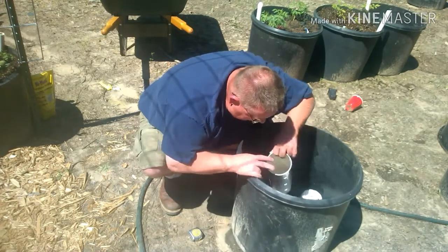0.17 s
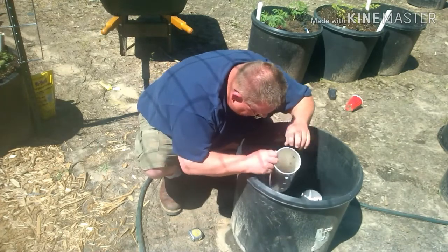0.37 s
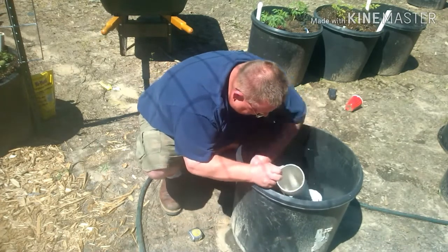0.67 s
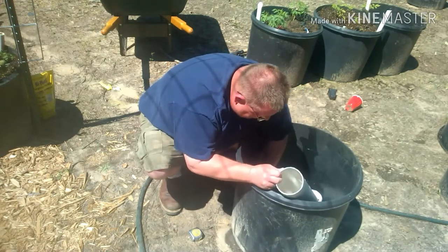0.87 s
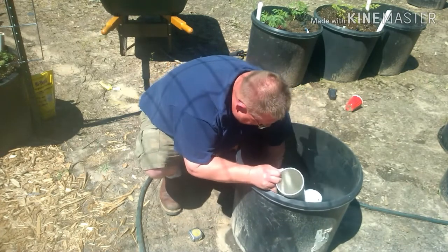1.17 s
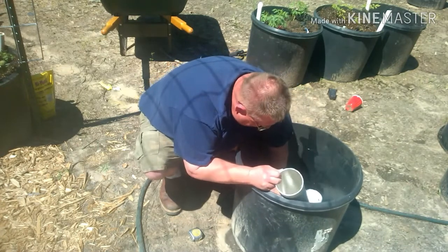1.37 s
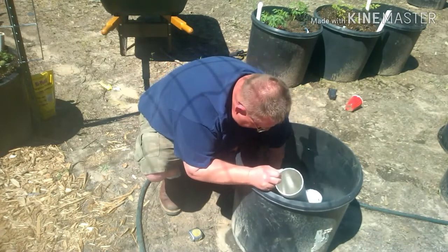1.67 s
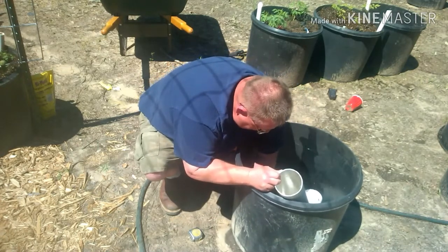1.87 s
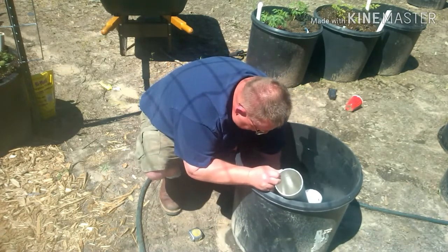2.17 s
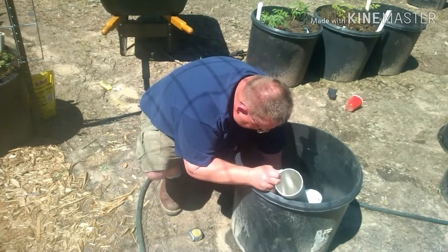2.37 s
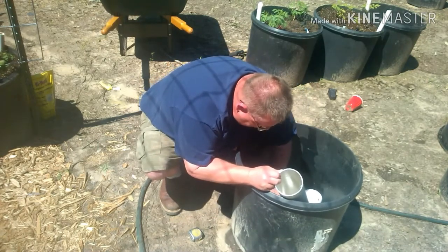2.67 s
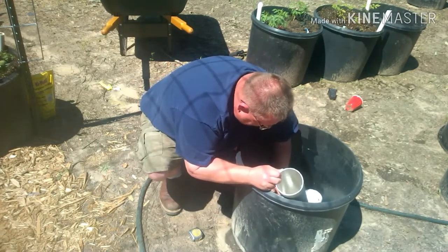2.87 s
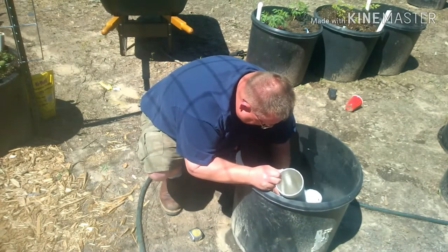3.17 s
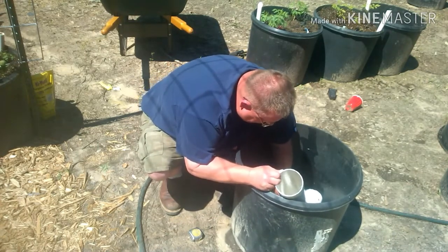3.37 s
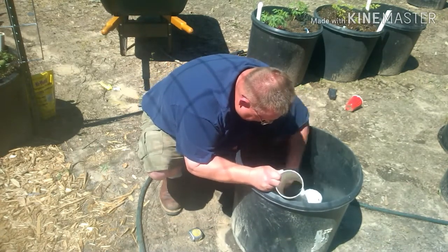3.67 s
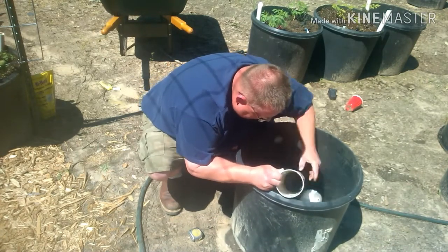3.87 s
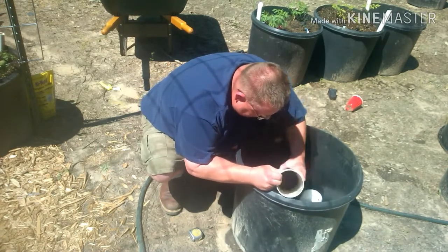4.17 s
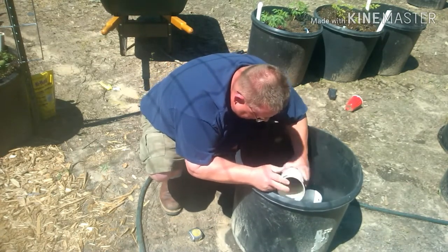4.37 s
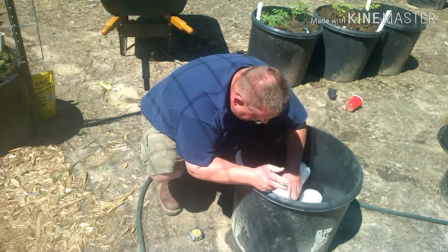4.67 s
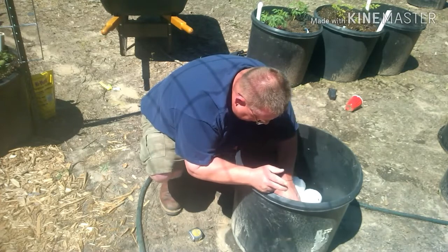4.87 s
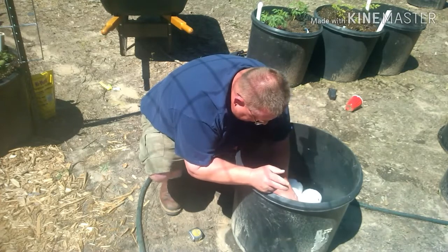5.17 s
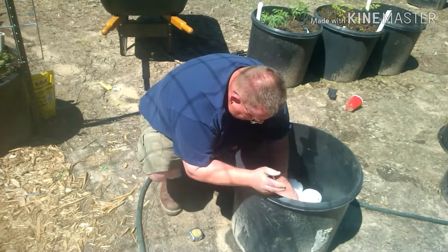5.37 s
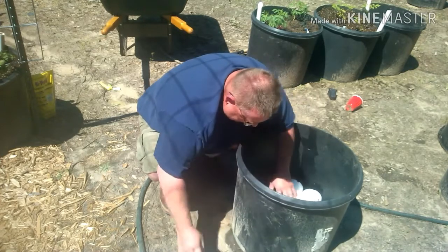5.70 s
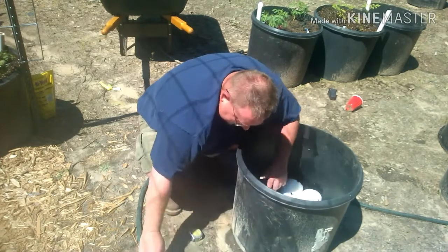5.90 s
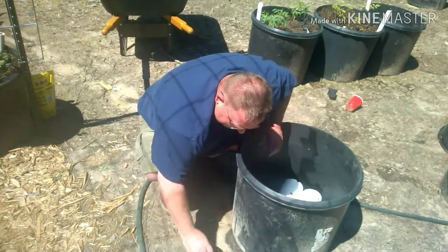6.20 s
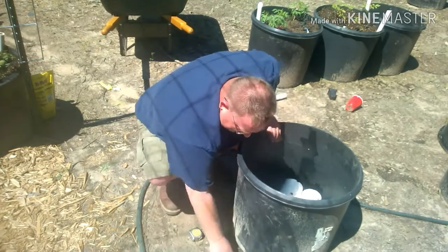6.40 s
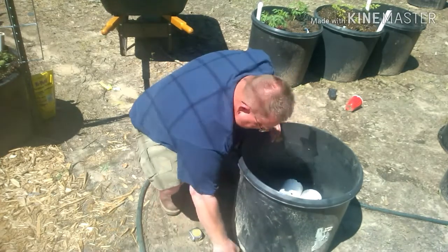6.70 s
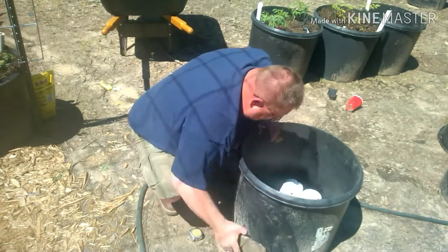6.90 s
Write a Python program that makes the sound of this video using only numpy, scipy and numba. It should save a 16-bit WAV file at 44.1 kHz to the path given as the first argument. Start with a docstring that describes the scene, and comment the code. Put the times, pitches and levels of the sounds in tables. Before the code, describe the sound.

Hollow plastic rattles, gritty drags and a final sharp knock in a large tub in a yard, then quiet air and birdsong.

```python
"""A knock and a faint gritty scrape, then bursts of plastic pipes dragged and knocked in a big plastic tub in a yard.
Slips and blows ring modes of the tub wall and the pipe; noise shaped by the same contacts is the crackling grit.
Birds, gliding near-sine notes, sing in the trees, with a few steady tones, over far traffic and wind of filtered noise.
A camera with two close microphone ports widens its stereo by subtracting each port, delayed, from the other."""
import sys
import numpy as np
from scipy import signal
from scipy.fft import rfft, irfft, next_fast_len
from scipy.io import wavfile
from scipy.ndimage import uniform_filter1d
from numba import njit

SR = 44100
rng = np.random.default_rng(int(sys.argv[2]) if len(sys.argv) > 2 else 0)


def pcm_store(signal):
    """Save signal as 16-bit PCM."""
    levels = np.round(np.clip(np.atleast_2d(signal), -1, 1) * 32767)
    wavfile.write(sys.argv[1], SR, levels.astype(np.int16).T)


N = 310464

# blows on the pipe: (time [s], crack level [dB], pipe body level [dB], pipe overtone level [dB],
# brightest overtone [Hz])
BLOWS = [(0.002, -66.0, -37.0, -46.5, 1070.0), (0.123, -49.0, -64.0, -63.5, 1500.0),
         (0.67, -50.5, -45.0, -45.5, 980.0), (0.8365, -67.0, -20.0, -29.5, 610.0),
         (0.856, -55.0, -26.0, -46.5, 780.0), (0.8975, -50.0, -43.0, -27.5, 760.0),
         (1.2232, -48.0, -28.0, -14.5, 920.0), (1.238, -40.0, -26.0, -9.5, 1400.0),
         (1.26, -55.0, -19.0, -28.5, 1080.0), (1.3144, -36.5, -30.0, -14.5, 1340.0),
         (1.3328, -54.0, -26.0, -17.5, 1160.0), (1.348, -56.0, -30.0, -18.5, 1140.0),
         (1.382, -42.0, -28.0, -15.5, 990.0), (1.4063, -39.5, -32.0, -15.5, 1280.0),
         (1.424, -56.0, -27.0, -19.5, 780.0), (1.45, -56.0, -21.0, -23.5, 1030.0),
         (1.4865, -34.5, -26.0, -11.5, 1080.0), (1.5168, -66.0, -19.0, -38.5, 910.0),
         (1.9533, -47.5, -64.5, -31.5, 1080.0), (1.971, -47.0, -44.0, -33.5, 780.0),
         (2.0036, -46.0, -42.0, -28.5, 980.0), (2.022, -45.0, -33.0, -32.5, 980.0),
         (2.074, -56.0, -18.0, -27.5, 920.0), (2.1135, -39.0, -16.0, -34.5, 760.0),
         (2.142, -50.0, -26.0, -28.5, 870.0), (2.1915, -43.0, -26.0, -20.5, 820.0),
         (2.2248, -40.0, -14.5, -22.5, 890.0), (2.2395, -34.0, -19.0, -11.5, 910.0),
         (2.2543, -49.0, -19.0, -20.5, 860.0), (2.2825, -34.0, -16.0, -11.5, 860.0),
         (2.335, -55.0, -17.0, -28.5, 810.0), (2.362, -50.0, -28.0, -24.5, 1120.0),
         (2.373, -56.0, -20.0, -24.5, 780.0), (2.386, -37.5, -18.0, -17.5, 700.0),
         (2.434, -52.0, -34.0, -30.5, 730.0), (2.469, -44.5, -47.0, -36.5, 1180.0),
         (2.788, -58.0, -36.5, -64.5, 790.0), (3.022, -48.0, -38.0, -30.5, 1260.0),
         (3.031, -34.0, -32.5, -16.0, 1100.0), (3.1437, -45.0, -44.0, -25.5, 1160.0),
         (3.165, -39.5, -46.0, -24.5, 1340.0), (3.18, -41.5, -39.0, -25.5, 1440.0),
         (3.197, -55.0, -26.0, -32.5, 990.0), (3.26, -48.0, -33.0, -22.5, 1100.0),
         (3.275, -45.0, -33.0, -17.5, 1180.0), (3.29, -52.0, -22.0, -30.5, 1070.0),
         (3.311, -50.0, -23.0, -28.5, 980.0), (3.3208, -37.5, -22.0, -20.5, 1070.0),
         (3.348, -55.0, -29.0, -31.5, 1070.0), (3.375, -60.0, -33.0, -38.5, 1050.0),
         (3.543, -53.0, -31.0, -29.5, 820.0), (3.5554, -55.0, -27.0, -33.5, 990.0),
         (3.772, -64.0, -34, -50.5, 760.0), (3.976, -48.0, -40, -47.5, 910.0),
         (4.1521, -60.0, -37.0, -48.5, 1160.0), (4.9468, -39.5, -25.0, -22.5, 1220.0),
         (4.956, -26.0, -18.0, -11.5, 940.0), (4.961, -40.0, -26.0, -13.5, 860.0),
         (5.0652, -24.5, -8.0, -9.5, 1460.0), (5.083, -37.5, -19.0, -16.5, 1220.0),
         (5.5238, -64.0, -44.0, -41.5, 1260.0), (5.758, -54.0, -43.0, -47.5, 1300.0)]


def pipes():
    """Dragged and struck pipes: the same slips ring the plastic and shed grit."""
    slips = stick_slip(rate=520., scatter_db=1.03)
    *body_drags, grit_drag = drag_gains()
    return tub_and_pipe(slips, body_drags) + grit_and_cracks(slips, grit_drag)


def tub_and_pipe(slips, drags):
    """Tub and pipe modes ring alike at both ports, a little later and softer at the far one."""
    # modes of the pipe body, the tub wall and the pipe overtones:
    # (frequency [Hz], level [dB], decay by 60 dB [s])
    pipe_body = [(318.4, -0.5, 0.035), (368, 2.5, 0.075), (424.7, 3, 0.085), (473, -2.5, 0.053),
                 (565, -3, 0.035)]
    tub_wall = [(120, 4, .14), (137, 10, .2), (152, 5, .14), (188, 3, .08), (240, 4, .06)]
    pipe_overtones = [(647, -2, 0.05), (776, -4, 0.05), (865.5, -5.5, 0.062), (939, -3, 0.056),
                      (1027, -7.5, 0.048), (1177, -8.5, 0.04), (1312, -5.5, 0.042), (1414, -4.5, 0.03),
                      (1682, -8, 0.028), (1815, -19, 0.04)]
    # thuds on the tub wall: (time [s], level [dB])
    thuds = [(0.8341, -32), (1.4045, -28.5), (1.42, -31), (2.2408, -25), (2.248, -14.5), (2.281, -15.5),
             (2.291, -18), (3.026, -32.5), (3.19, -33), (3.235, -28), (3.3216, -29), (3.334, -21),
             (3.5419, -42), (3.7702, -38), (4.1513, -37), (4.9466, -28), (5.066, -17)]
    far_port_lag, far_port_db = 4.83, -0.95  # lag in samples

    hit_s, _, body_db, overtone_db, bright_hz = np.transpose(BLOWS)
    thud_s, thud_db = np.transpose(thuds)
    near = ring(pipe_body, slips, drags[0], hit_s, body_db, 420, spot_db=2.6, spread_s=.0025)
    near = near + ring(tub_wall, slips, drags[1], thud_s, thud_db, 150, spot_db=2.6, spread_s=.0015)
    near = near + ring(pipe_overtones, slips, drags[2], hit_s, overtone_db, bright_hz, spot_db=2.6, spread_s=.0015)
    # the ringing is cut steeply below about 112 Hz
    near = signal.sosfilt(signal.butter(6, 112, "high", fs=SR, output="sos"), near)

    # a phase slope delays by a fraction of a sample
    size = next_fast_len(N)
    turns = np.arange(size // 2 + 1) / size * far_port_lag
    far = irfft(rfft(near, size) * np.exp(-2j * np.pi * turns), size)[:N]
    return np.array([near, undb(far_port_db) * far])


def grit_and_cracks(slips, drag):
    """Grit and cracks scatter off the wall and reach the two ports unlike: separate noise at each."""
    # colour of grit and cracks: (frequency [Hz], relative level [dB])
    sand_spectrum = [(1200, 4), (2050, 6.5), (3400, -0.5), (5000, -1), (7000, -1), (10000, -3), (14500, -5),
                     (15500, -25)]
    # each slip sheds a short spray of grains over an even sandy hiss
    spray = signal.lfilter([1], [1, -.97], spikes(*slips) ** 2)
    grit = drag * np.sqrt(0.52 + 0.29 * spray / spray.mean())

    # a crack has a sharp burst and a fainter, slower tail
    t = np.arange(int(.08 * SR)) / SR
    burst = 1.15 * np.exp(-t / 0.0066) * (1 - np.exp(-t / 0.0007))
    tail = burst + 0.17 * np.exp(-t / 0.027)
    hits = spikes((np.transpose(BLOWS)[0] * SR).astype(int), undb(np.transpose(BLOWS)[1]))
    crack = signal.fftconvolve(hits, tail)[:N]

    sand = colour(rng.standard_normal((2, N)), sand_spectrum)
    return 1.41 * sand * np.hypot(grit, crack)


def drag_gains():
    """Rise, hold and fall of each drag for pipe body, tub wall, overtones and grit; overtones fall furthest."""
    # drags: (start [s], rise [s], hold [s], fall [s], pipe body level [dB], swell over the hold [dB],
    # then tub wall, pipe overtones and grit against the body [dB])
    drags = [(0.05, 0.028, 0.12, .05, -70, -3.5, -2, -8, 15),
             (0.2, 0.083, 0.018, 0.045, -46.5, -4, -13, -6, -20),
             (0.833, 0.0049, 0.017, 0.046, -36.5, 3, -12, -12, -35),
             (0.839, 0.029, .02, 0.053, -41.5, 1.5, -6, 6, -11),
             (1.189, 0.039, 0.24, 0.069, -28.5, -4, -14, 2, -11.5),
             (1.49, 0.012, 0.024, 0.17, -39, -3, -3, -1, -34),
             (1.92, 0.14, 0.34, 0.18, -31.5, 3, -19.5, -3, -17),
             (2.19, 0.062, 0.034, 0.056, -24, -0.5, -0.5, -4, -26.5),
             (3.129, 0.048, .155, .13, -35, 3, -3.5, 1.5, -19),
             (4.11, 0.042, 0.025, 0.15, -49.5, 0.5, -4, -10, -4),
             (4.38, 0.025, 0.032, 0.027, -47, -2.5, -20, -1, -14),
             (4.944, 0.0038, 0.011, 0.075, -24, -1, -9, -2, -17),
             (4.989, 0.041, 0.029, 0.012, -56.5, -2, 0, 18, 19.5),
             (5.058, 0.004, 0.019, 0.088, -19.5, 2.5, -1.5, -6.5, -17),
             (5.12, 0.032, 0.11, .15, -67.5, -4.5, 20.5, -7, 0),
             (5.5, 0.026, .01, 0.058, -44, -3, -23, -12, -13)]
    # how far under its hold a drag rises from and falls to: (body [dB], tub [dB], overtones [dB], grit [dB])
    fade_db = (32, 28.7, 40.7, 37)
    tables = []
    for start, rise, hold, fall, db, swell_db, *shares_db in drags:
        times = np.cumsum([start, rise, hold, fall])
        shape = db + np.array([[0], [0], [swell_db], [swell_db]]) - np.outer([1, 0, 0, 1], fade_db)
        tables.append(np.column_stack([times, shape + [0, *shares_db]]))
    return [curves(tables, k + 1) for k in range(4)]


def stick_slip(rate, scatter_db):
    """Random slip moments, about rate a second, of nearly even size; train rms 1."""
    chance = rng.random((int(N / SR * 1500), 2))
    at = np.cumsum(-np.log(chance[:, 0]) * SR / rate).astype(int)
    size = undb(-scatter_db * np.log(0.089 + chance[:, 1]))[at < N]
    return at[at < N], size * np.sqrt(N / np.sum(size ** 2))


def ring(modes, slips, slip_gain, hit_s, blow_db, bright_hz, spot_db, spread_s):
    """Slips and blows ring each mode; every contact lands on another spot, so mode shares and onsets differ."""
    drift_share = .02  # grip and tilt change, so each mode's pitch drifts
    wander_db = 3.2  # as the contact slides along, each mode swells and fades on its own
    focus_db = 10  # a blow's modes an octave from its brightest are this much weaker
    push_cycles = .2  # plastic yields: a blow builds each mode up over this many cycles

    at, size = slips
    hits = (hit_s * SR).astype(int)
    slip_spot = rng.standard_normal((len(at), len(modes)))
    hit_spot = undb(spot_db * rng.standard_normal((len(hits), len(modes))))
    onset = (spread_s * SR * rng.random((len(hits), len(modes)))).astype(int)
    out = 0
    for k, (hz, db, t60) in enumerate(modes):
        fade = np.exp(-np.log(1000) / (t60 * SR))
        step = 2 * np.pi * hz * (1 + drift_share * walk(9)) / SR
        # a dense train of rms 1 rings the mode at rms 1
        even = np.sqrt(2 * (1 - fade ** 2))
        rub = spikes(at, size * slip_spot[:, k]) * slip_gain * undb(wander_db * walk(14)) * even
        focused_db = blow_db - focus_db * np.log2(hz / bright_hz) ** 2
        blow = spikes(hits + onset[:, k], undb(focused_db) * hit_spot[:, k])
        soft = np.exp(-hz / (push_cycles * SR))
        out = out + undb(db) / np.sqrt(len(modes)) * resonate(rub, blow, step, fade, soft)
    return out


@njit
def resonate(rub, blow, step, fade, soft):
    """One mode whose phase advances by step radians a sample; blows build it up, slips kick it at once."""
    out, mode, push = np.empty(len(rub)), 0j, 0j
    for i in range(len(rub)):
        turn = np.exp(1j * step[i])
        push = soft * turn * push + (1 - soft) * blow[i] + 1e-18
        mode = fade * turn * mode + rub[i] + push
        out[i] = mode.imag
    return out


def birds_and_tones():
    """Bird notes and steady tones reach one port late; bird notes and twitter also ring on among the trees."""
    lag = 11  # samples between the ports for notes and steady tones
    trees_db = 1.2
    flutter, rasp = walk(150), walk(400)
    song = bird_notes(flutter, rasp)
    direct = song + steady_tones(flutter)
    echo = among_trees(song + twitter(count=160, level_db=-66))
    return undb([[1.2], [-.8]]) * np.array([direct, np.roll(direct, lag)]) + undb(trees_db) * echo


def bird_notes(flutter, rasp):
    """Near-sine notes with a slight flutter glide to a turn and on to their end."""
    # notes: (start [s], first glide [s], second glide [s], start [Hz], turn [Hz], end [Hz], level [dB])
    notes = [(.445, 0.016, 0.017, 4300, 4250, 3350, -66), (.51, .03, .012, 4300, 4350, 4100, -65),
             (.578, .008, .008, 3100, 3600, 4200, -62), (.697, 0.013, 0.02, 4150, 3450, 3500, -56),
             (.754, 0.01, 0.0082, 3260, 4220, 3430, -50.5), (.922, 0.021, 0.013, 3040, 4220, 3330, -47.5),
             (2.34, 0.011, 0.008, 3480, 3150, 2750, -47), (2.44, .21, 0.065, 2300, 3380, 3520, -51),
             (2.872, .008, .02, 2380, 2420, 2420, -53), (2.895, 0.017, 0.026, 4250, 3280, 2900, -61),
             (3.066, 0.021, 0.022, 3050, 4350, 4380, -49), (4.293, .011, 0.015, 4000, 4180, 3420, -56),
             (4.297, .008, .02, 4720, 4700, 3800, -58), (4.339, 0.017, 0.016, 3150, 4720, 3200, -49.5),
             (4.438, 0.008, 0.016, 3700, 4200, 3050, -48), (4.675, .012, .014, 3800, 3650, 3350, -61),
             (4.55, 0.008, 0.008, 2900, 3000, 3150, -60), (.493, 0.007, 0.007, 3150, 3400, 3600, -60),
             (.525, .008, .008, 3400, 3500, 3700, -61), (6.345, 0.0081, .015, 3880, 4000, 3890, -58),
             (6.366, 0.007, 0.007, 3100, 3700, 4400, -56), (6.39, 0.02, 0.016, 5000, 3500, 3200, -52),
             (6.47, 0.0087, .01, 3040, 3320, 2980, -57), (6.54, 0.036, 0.009, 3450, 4350, 3200, -46),
             (6.606, 0.0089, 0.0041, 3140, 3960, 4600, -45), (6.648, .005, .006, 4100, 3700, 3250, -57),
             (6.755, .006, .008, 3900, 4000, 4050, -58), (6.845, .01, .022, 3230, 3400, 4000, -62),
             (6.865, .005, .006, 3350, 3300, 3250, -58), (6.92, 0.01, .012, 3080, 3380, 3700, -59.5)]
    hoarse_rad_per_s = 2.2  # phase jitter grows with the length of a note
    edge, rounding = .3, .26  # shares of a note: fading in and out; smoothing the turn
    sag_db = -3  # level change over the second glide
    t, song = np.arange(N) / SR, np.zeros(N)
    for start, first, second, *stops_hz, db in notes:
        at = np.arange(int(start * SR), int((start + first + second) * SR))
        hz = np.interp(t[at] - start, [0, first, first + second], stops_hz)
        hz = uniform_filter1d(hz, 1 + int(rounding * len(at)), mode="nearest")
        db = db + np.interp(t[at] - start, [first, first + second], [0, sag_db])
        phase = 2 * np.pi * np.cumsum(hz) / SR + hoarse_rad_per_s * (first + second) * rasp[at]
        song[at] += signal.windows.tukey(len(at), edge) * undb(db + 2.2 * flutter[at]) * np.sin(phase)
    return song


def steady_tones(flutter):
    """A pipe hoot, a dry squeak, a bird note and faint whistles: sines wavering in phase and level, no echo."""
    # tones: (start [s], end [s], frequency [Hz], level [dB])
    tones = [(0.228, 0.332, 549, -48), (4.516, 4.532, 4870, -59), (4.588, 4.61, 2990, -55),
             (5.555, 5.847, 1377, -56.5), (6.32, 6.46, 1362, -61.5), (6.78, 6.87, 1380, -62)]
    t, out = np.arange(N) / SR, np.zeros(N)
    for start, end, hz, db in tones:
        at = np.arange(int(start * SR), int(end * SR))
        phase = 2 * np.pi * hz * t[at] + 0.65 * flutter[at]
        out[at] += signal.windows.tukey(len(at), .3) * undb(db + 3.3 * flutter[at - 900]) * np.sin(phase)
    return out


def twitter(count, level_db):
    """Many far birds: short random sweeps."""
    out, t = np.zeros(N + SR), np.arange(int(0.036 * SR)) / SR
    for when, pitch, bend, size in rng.random((count, 4)):
        hz = 2700 + 1300 * pitch + 50000 * (bend - .6) * t
        at = int(when * N)
        tone = np.hanning(len(t)) * np.sin(2 * np.pi * np.cumsum(hz) / SR)
        out[at:at + len(t)] += undb(level_db - 2.2 * size) * tone
    return out[:N]


def among_trees(song):
    """Decaying noise rings the song on, with a late smeared echo from across the yard; unlike at the ports."""
    t60_s, slap_s, slap_db = 0.55, 0.27, -18
    t = np.arange(SR) / SR
    slap = undb(slap_db) * np.exp(-((t - slap_s) / 0.13) ** 2)
    leaves = rng.standard_normal((2, SR)) * (undb(-60 * t / t60_s) + slap)
    return signal.fftconvolve(song[None], leaves / np.sqrt(np.sum(leaves[0] ** 2)), axes=1)[:, :N]


def yard():
    """Far traffic, and moving air: octave bands swell together and flicker alone; a few whirrs sit in it."""
    # noise alike and unlike at the two ports: (frequency [Hz], relative level per hertz [dB])
    shared_spectrum = [(45, -64), (90, -71.5), (180, -72.5), (350, -80.5), (700, -88.5), (1100, -104.5),
                       (1600, -99.2), (2050, -108), (2400, -95), (3400, -100.7), (5000, -106.4),
                       (7000, -108.1), (10000, -107.8), (14500, -112.2)]
    apart_spectrum = [(45, -80.5), (90, -102), (180, -88.5), (350, -94), (700, -89), (1100, -96.5),
                      (1600, -100), (2050, -93), (2400, -101.5), (3400, -102.9), (5000, -107.1),
                      (7000, -106.7), (10000, -107.9), (14500, -112.7)]
    # steady narrow whirrs: (centre [Hz], width [Hz], level [dB], left minus right at the ports [dB])
    whirrs = [(2022, 22.6, -64.5, -4.5), (715, 135, -61, -5.5), (1105, 23, -70, -8.5)]
    noise = rng.standard_normal((2, N)) * np.sqrt(SR / 2)
    shared, apart = colour(noise[0], shared_spectrum), colour(noise[1], apart_spectrum)
    ports = np.array([shared + 0.84 * apart, shared - 2.15 * apart])
    out, swell = 0, walk(1.0)
    # peel octaves off from the top; low ones swell and flicker most, and the rest below stays even
    for hz in 16000 / 2 ** np.arange(1, 9.):
        low = signal.sosfiltfilt(signal.butter(2, hz, fs=SR, output="sos"), ports)
        gusty = np.clip(1.2 - 0.12 * np.log2(hz / 60), .1, 2)
        out = out + (ports - low) * undb(gusty * (0.81 * swell + 1.2 * walk(20.0)))
        ports = low
    for hz, width, db, pan_db in whirrs:
        band = [hz - width / 2, hz + width / 2]
        whirr = signal.sosfilt(signal.butter(2, band, "band", fs=SR, output="sos"), noise)
        out = out + undb([[db + pan_db], [db]]) * unit(whirr)
    return out + ports


def wind():
    """Wind on the ports: low buffeting noise, unrelated at the two."""
    # gusts: (time [s], level [dB])
    gusts = [(0.0, -51), (1.1, -43), (1.6, -57), (2.8, -51.5), (3.69, -37.5), (4.5, -67), (5.6, -53),
             (7.04, -52)]
    band = signal.butter(2, [22, 75], "band", fs=SR, output="sos")
    rumble = signal.sosfilt(band, rng.standard_normal((2, N)))
    return unit(rumble) * curves([gusts], 1) * undb(2.2 * walk(17))


def undb(db):
    """Decibels to gain."""
    return 10 ** (np.asarray(db) / 20)


def unit(x):
    """Scale to rms 1."""
    return x / np.sqrt(np.mean(x ** 2))


def walk(rate):
    """Random levels held 1 / rate s and smoothed twice; spread near 1."""
    k = int(SR / rate)
    held = np.repeat(rng.standard_normal(N // k + 1), k)
    return 1.45 * uniform_filter1d(uniform_filter1d(held, k), k)[:N]


def colour(x, spectrum):
    """Weight a signal by (frequency [Hz], level [dB]) points on a log frequency axis."""
    size = next_fast_len(N)
    hz, db = np.transpose(spectrum)
    bins_hz = np.arange(1, size // 2 + 2) * SR / size
    gain = undb(np.interp(np.log(bins_hz), np.log(hz), db))
    return irfft(rfft(x, size) * gain, size)[..., :N]


def curves(tables, column):
    """Gain over time from one dB column of several tables, overlaps added; silent outside them."""
    out = np.zeros(N)
    for rows in map(np.array, tables):
        at = np.arange(int(rows[0, 0] * SR), min(int(rows[-1, 0] * SR), N))
        out[at] += undb(np.interp(at / SR, rows[:, 0], rows[:, column]))
    return out


def spikes(at, size):
    """Impulses of given sizes at given samples."""
    return np.bincount(at, size, N)[:N]


def scene():
    """Pipes in the tub, birds and steady tones, yard and wind at the two ports."""
    return pipes() + birds_and_tones() + yard() + wind()


def record(dry):
    """Each channel loses a delayed, dulled share of the other port, which widens the image; the top is cut."""
    # tilt between the ports: (frequency [Hz], left minus right [dB]), half given to each side
    port_tilt = [(900, -0.5), (1500, 1.5), (2000, -6), (2700, 2), (4800, 6.5), (6500, 0.5), (10000, -3)]
    cross_share, cross_lag = 0.73, 16  # lag in samples
    dull, top_hz = 0.6, 15600  # dull is the one-pole smoothing of the subtracted copy
    other = signal.lfilter([1 - dull], [1, -dull], np.roll(dry[::-1], cross_lag, axis=1))
    left, right = dry - cross_share * other
    left = colour(left, np.multiply(port_tilt, [1, .5]))
    right = colour(right, np.multiply(port_tilt, [1, -.5]))
    top_cut = signal.ellip(10, .2, 80, top_hz, fs=SR, output="sos")
    return signal.sosfilt(top_cut, np.array([left, right]))


dry = scene()
out = record(dry)
pcm_store(out)
```